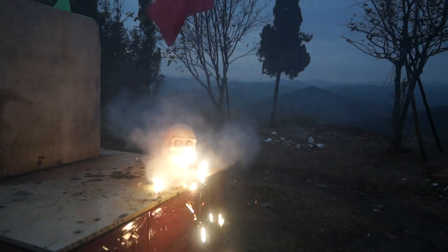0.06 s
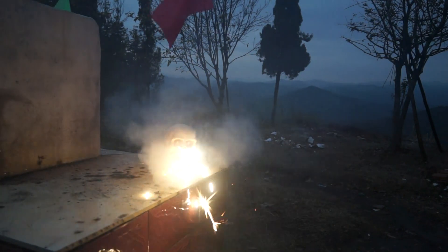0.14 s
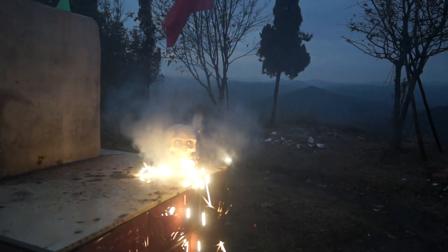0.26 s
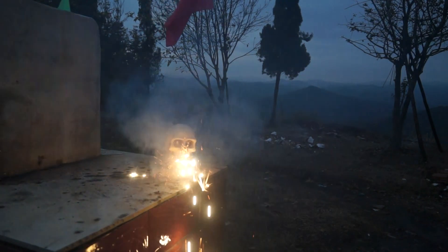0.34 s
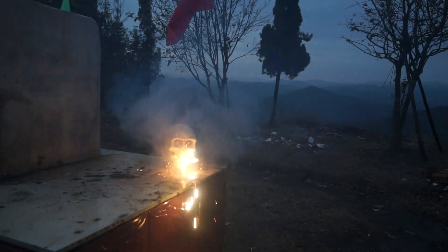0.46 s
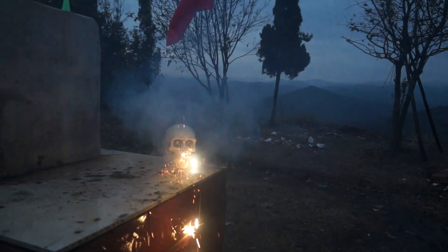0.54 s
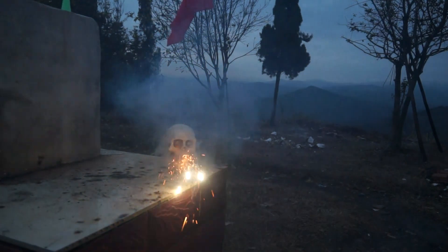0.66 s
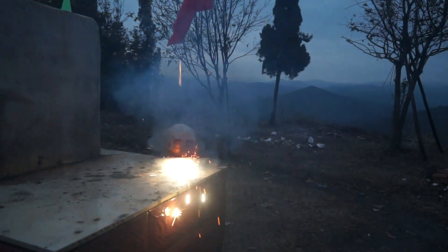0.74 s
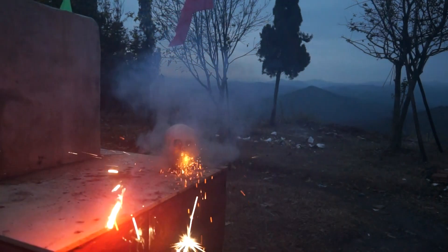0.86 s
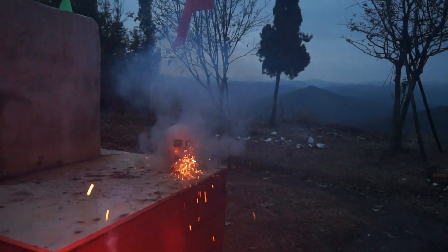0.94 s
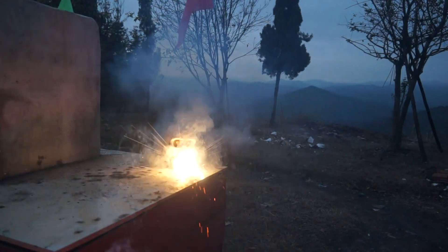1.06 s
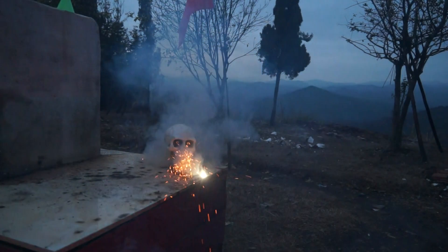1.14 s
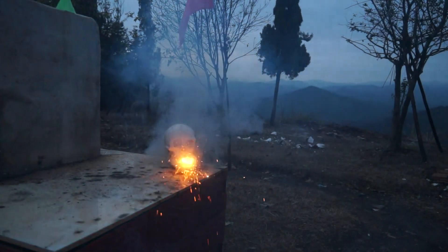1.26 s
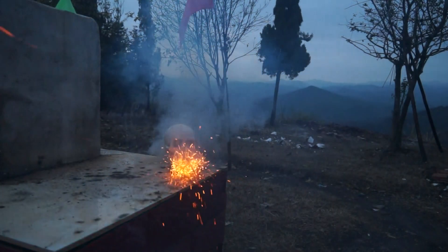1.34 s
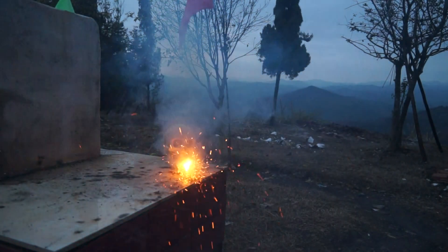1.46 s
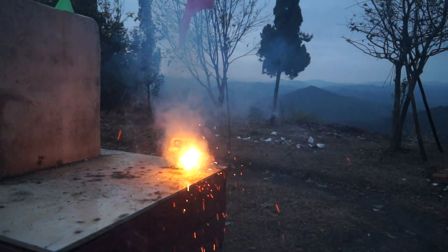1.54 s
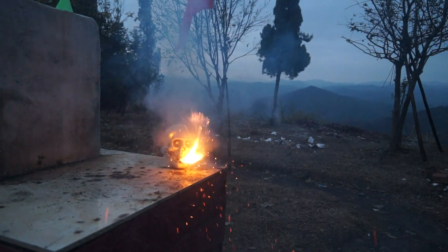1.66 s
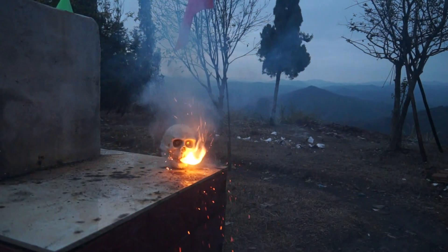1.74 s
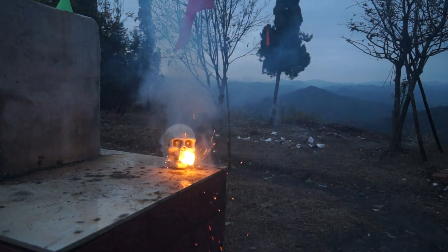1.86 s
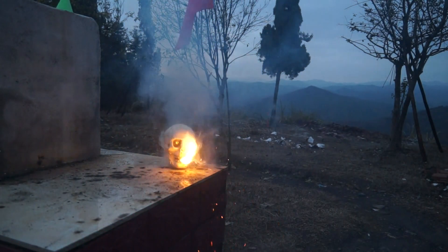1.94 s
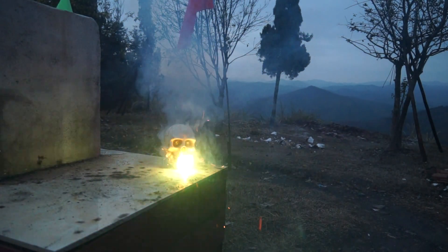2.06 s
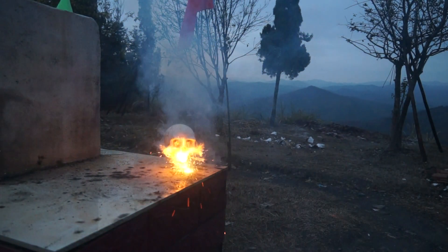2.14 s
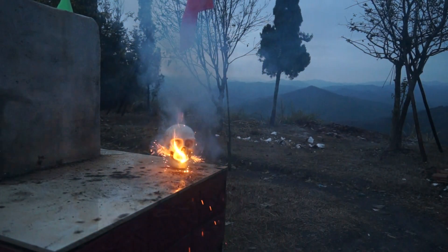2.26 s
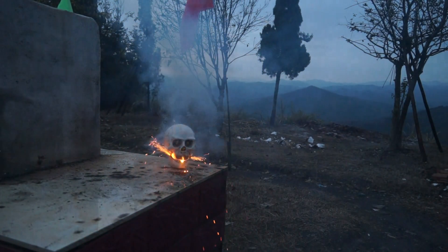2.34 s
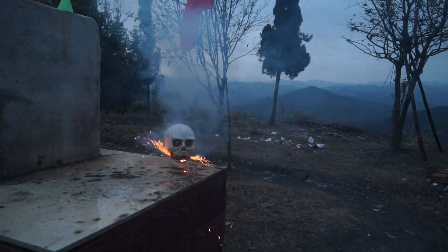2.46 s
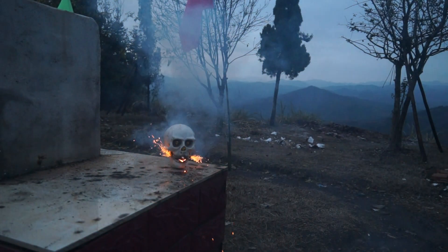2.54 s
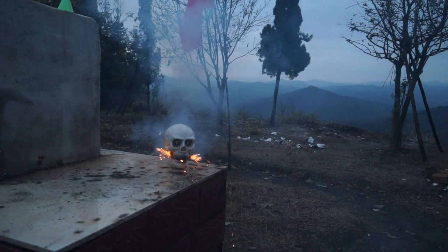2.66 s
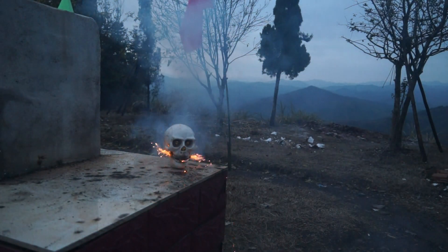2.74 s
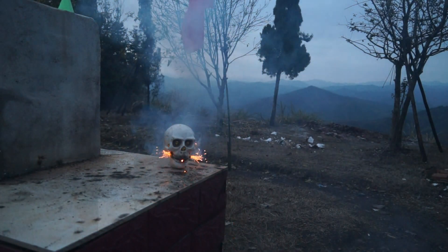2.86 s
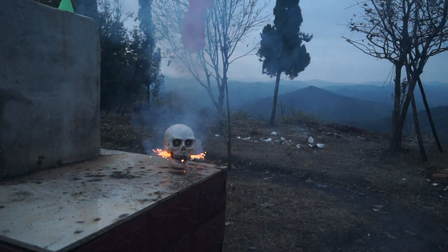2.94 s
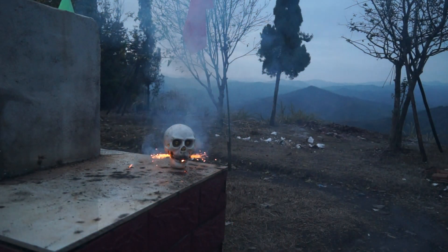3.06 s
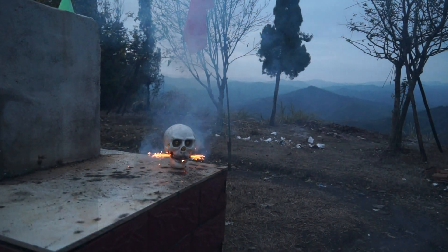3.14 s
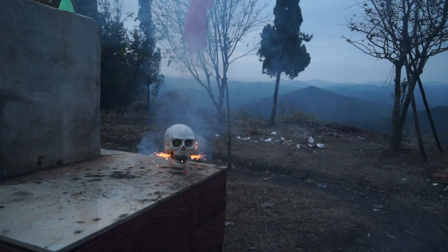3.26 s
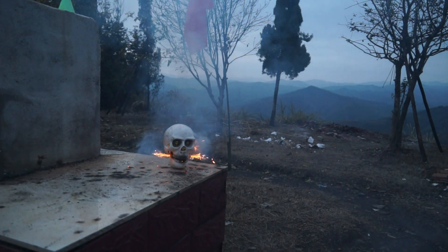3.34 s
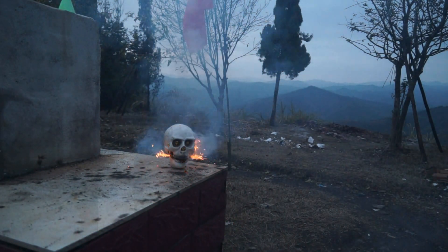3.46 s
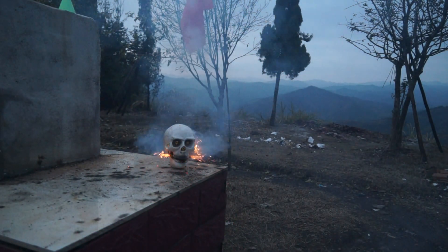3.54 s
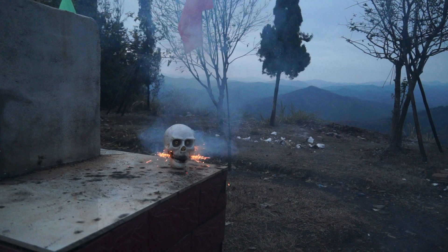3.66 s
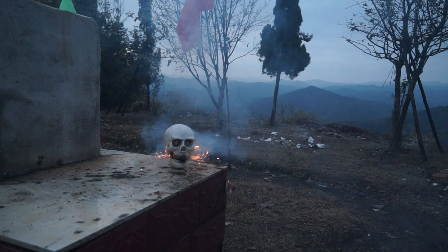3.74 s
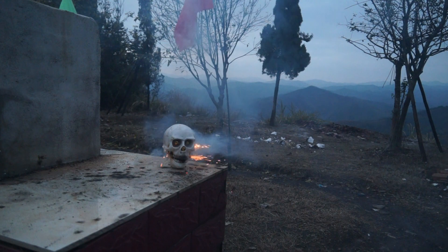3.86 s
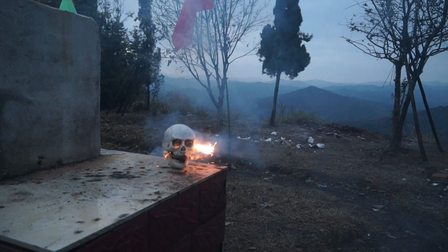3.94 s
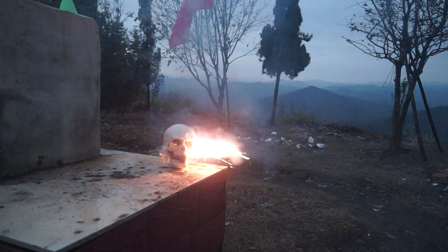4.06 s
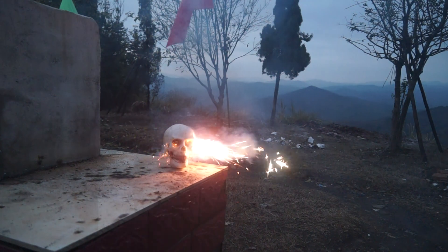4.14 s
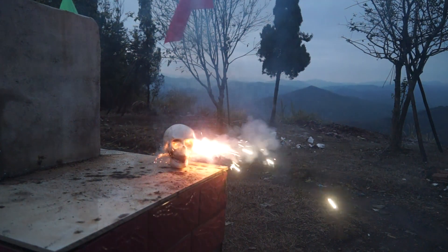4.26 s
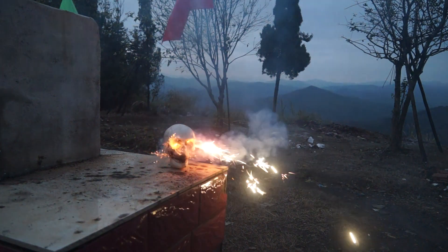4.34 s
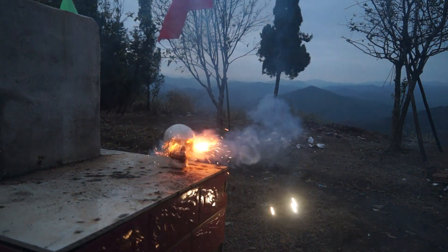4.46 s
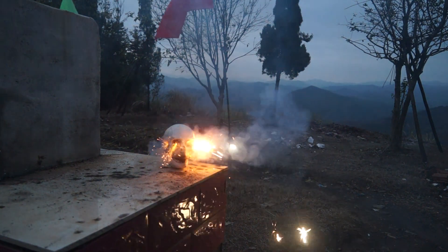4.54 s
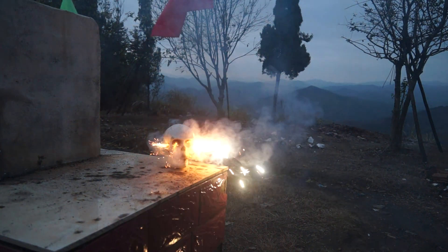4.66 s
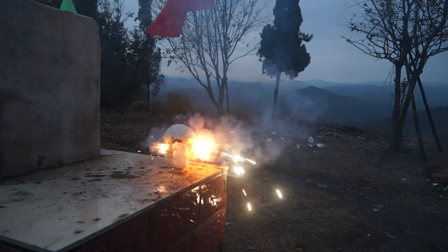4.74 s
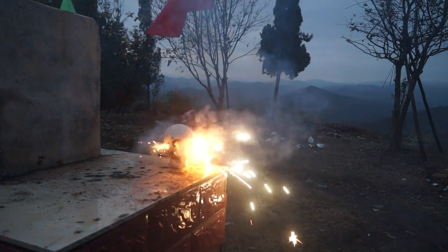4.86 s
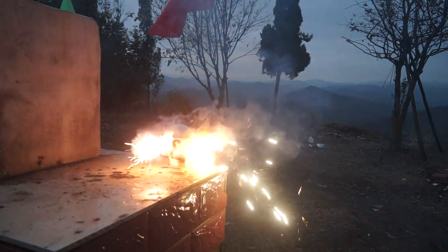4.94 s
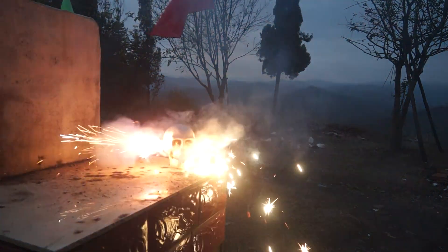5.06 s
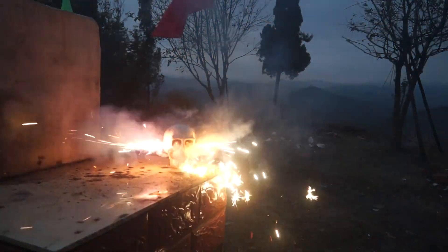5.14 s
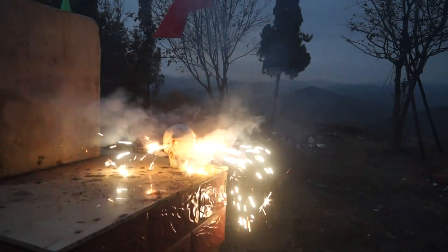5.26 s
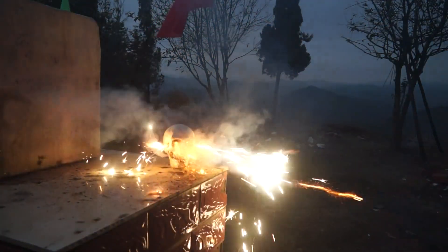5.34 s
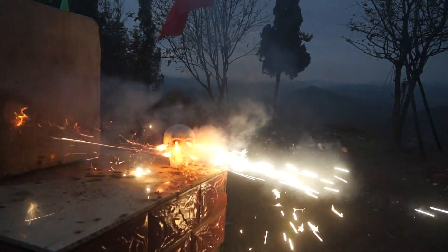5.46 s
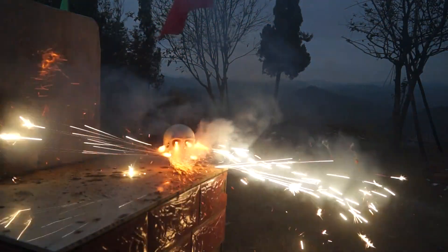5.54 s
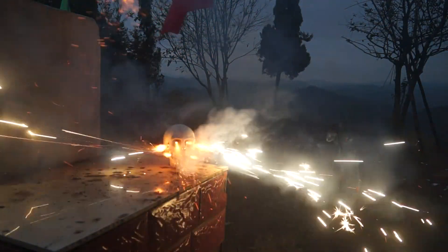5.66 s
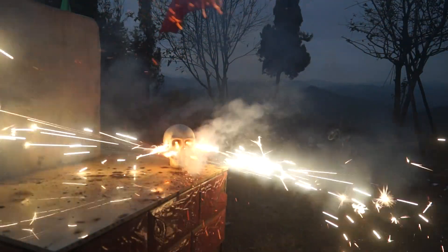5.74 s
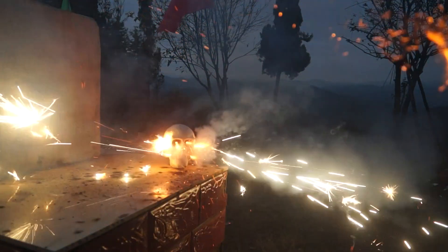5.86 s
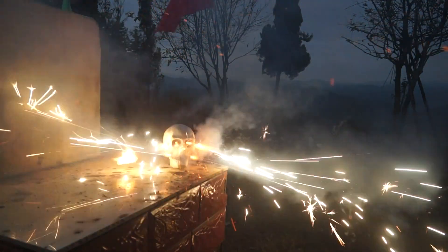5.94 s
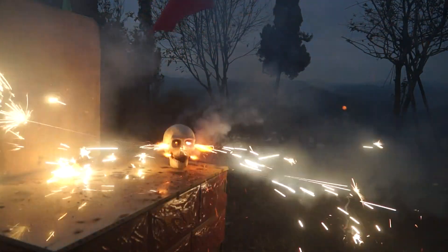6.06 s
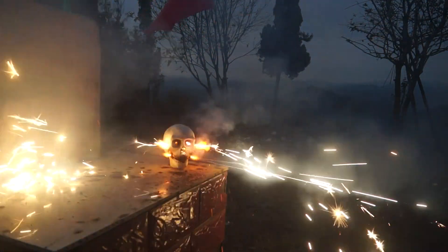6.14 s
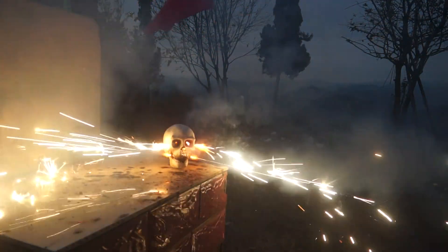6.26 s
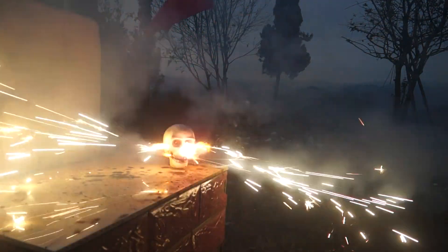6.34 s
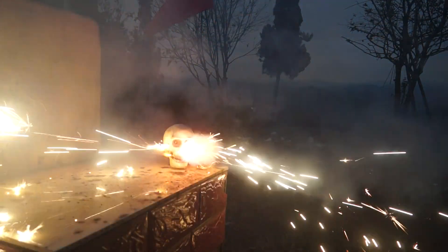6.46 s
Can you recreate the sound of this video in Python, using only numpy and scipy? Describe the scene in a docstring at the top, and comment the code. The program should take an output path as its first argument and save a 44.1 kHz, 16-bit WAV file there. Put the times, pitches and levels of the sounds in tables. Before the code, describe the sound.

A small firework on a stone ledge outdoors fizzes with crackling sparks and fires a quick, irregular run of sharp pops with short echoes. It sinks to a thin hiss while a fuse ticks softly. Jets of sparks then light and swell in rushing flares, and after one more pop two shrill whistles scream, sliding down in pitch. The close microphone overloads slightly on the pops and whistles.

```python
"""Fountain firework on a stone ledge

Outdoors, with a stereo microphone close by. The first charge sprays crackling sparks, throws off
sharp pops as pellets explode, and sinks to a thin hiss. A fuse burns through to the side jets, which
light and swell; then two whistle tubes scream, falling in pitch as they burn hollow. The stone
reflects the hiss and cracks, walls and trees return the pops, and pops and whistles overload the mic."""
import sys
import numpy as np
from scipy import signal
from scipy.fft import rfft, irfft, next_fast_len
from scipy.io import wavfile
from scipy.ndimage import map_coordinates

SR = 44100
rng = np.random.default_rng(int(sys.argv[2]) if len(sys.argv) > 2 else 0)


def dump_mix(stems):
    """Bounce the given channels to the path in sys.argv[1] as a 16-bit WAV at rate SR."""
    frames = np.atleast_2d(stems).T  # one column per channel
    limited = np.clip(frames, -1, 1)  # hard clip at full scale
    pcm = np.round(limited * 32767).astype(np.int16)
    wavfile.write(sys.argv[1], SR, pcm)


N = 286650

# Spectra of the first charge's spray and of its flame. Each row: frequency in Hz, relative level in dB.
SPRAY_COLOUR = [(25, -15), (120, -6), (320, 6), (500, 1), (1000, 0.5), (1700, -1), (2100, 6), (2900, -1),
                (4500, -4), (9500, -5), (11500, -5), (15500, -12)]
FLAME_COLOUR = [(1000, -21), (7600, -12.5), (8600, -7.5), (10200, -3), (11300, -8.5), (12400, -10.5),
                (13500, -16), (16000, -13)]
# The thin flame left burning at the mouth. Each row: time in seconds, level in dB.
FLAME_LEVELS = [(.25, -43), (.5, -36.5), (1, -37), (1.25, -45.5), (1.5, -53), (1.65, -46), (2, -45),
                (2.2, -53.5), (2.9, -49.5), (3.5, -57)]
# Exploding pellets, and last the thump of the first whistle tube igniting. Each row: start in seconds, crack
# strength in dB, gas thump strength in dB.
POPS = [(0.0625, -14, -58), (0.2245, -13.5, -55), (.3164, -7, -51), (0.4221, -2, -57), (0.4351, 0, -29),
        (.4735, -7.5, -35), (0.5308, -5.5, -29), (0.568, 13, -22), (0.706, 14, -25), (0.72, 3.5, -42),
        (0.7434, 6, -38), (0.7537, -2, -26), (0.7734, 16, 11), (0.8109, 14.5, -10), (0.8851, 16, -29),
        (0.8961, 16, -2.5), (0.9608, -7.5, -60), (1.06, 9, -23), (1.1062, 14.5, -26), (1.1145, 10, -35),
        (1.12, 18, -46), (1.1394, -10, -46), (1.18, -19, -45), (1.1925, 14, -45), (1.2869, 12.5, -26),
        (1.3251, 17.5, -26), (1.3724, 15.5, -3), (1.4497, 15.5, -51), (1.4572, 6, -48), (1.4892, -11, -43),
        (1.675, -25.5, -59), (1.9738, 7, -28), (2.0263, 17.5, -4), (2.1691, -25, -55), (4.2372, 3, -34),
        (4.3028, 0, -20), (4.584, -11, -40), (5.3535, 5, 5)]
# Spectra of a pop close by and of its echo. Each row: frequency in Hz, relative level in dB.
CRACK_COLOUR = [(60, -6.5), (400, -10), (1000, -4.5), (1800, 1), (3000, -0.5), (5000, 2.5), (9000, 3.5),
                (12000, -3.5), (16000, -18)]
ECHO_COLOUR = [(60, -14.5), (500, -9), (2000, -1.5), (4500, 2.5), (9000, -3), (16000, -14)]
# Spectra of the fuse and of the channel it burns in. Each row: frequency in Hz, relative level in dB.
FUSE_COLOUR = [(25, -26), (120, -12.5), (260, -1.5), (370, -3), (470, -14), (620, -3), (1100, -1),
               (1550, 1.5), (2600, -3), (4100, 1.5), (5000, 0.5), (6500, -20), (10000, -2), (15500, -13)]
CHANNEL_COLOUR = [(3500, -30), (5200, -4.5), (6200, 3), (7000, -18), (9000, -22)]
# Spectra of the jets' hiss (and all sparks), rush and roar.
# Each row: frequency in Hz, relative level in dB.
HISS_COLOUR = [(2500, -15), (5000, -8), (7000, -2.5), (9500, 1), (12000, -3), (14500, -5.5), (16000, -17)]
RUSH_COLOUR = [(600, -15.5), (1600, -3), (2350, 2), (3000, -3.5), (4500, -0.5), (6200, 2), (8000, -2.5),
               (12000, -24)]
ROAR_COLOUR = [(25, -34), (130, -7.5), (290, 8.5), (480, -1.5), (730, 7.5), (1300, 2), (2500, -8),
               (6000, -45)]
# Flare-ups of the jets. Each row: middle and half-width in seconds, extra hiss and extra roar in dB.
FLARES = [(4.085, 0.06, 7.5, 9.5), (4.225, 0.096, 7.5, 1), (4.821, 0.064, 0, 11), (5.044, 0.091, 7.5, 16),
          (5.2, .04, 8.5, -3.5)]
# Whistle tubes. Each row: start in seconds, first and burnt-out pitch in Hz, hold and sinking time
# constant in seconds, waver and jitter as shares of the pitch, exhaust level in dB.
TUBES = [(5.348, 2852, 2208, .11, .62, 0.003963, .005, -15),
         (5.475, 3104, 2312, .005, .535, .007, .008, -8.5)]
# How hard each tube is driven. Each row: time in seconds, main mode in dB, upper mode in dB.
FIRST_DRIVE = [(5.41, 8.5, 5.5), (5.53, -0.5, -5), (5.7, 1, -1.5), (6.2, 0.5, -12), (6.5, -2.5, -10)]
SECOND_DRIVE = [(5.48, 8, -4), (5.56, -3.5, -5.5), (5.65, -11, 1.5), (5.73, 13.5, 9.5), (5.82, 13.5, 13.5),
                (5.89, 8.5, -6), (6.049, 4.5, 7), (6.2, 1, -0.5), (6.5, 1.5, 4)]
# Whistle partials; pulses alternating strong and weak give the half multiples.
# Each row: multiple of the pitch, level in dB against the main mode.
PARTIALS = [(.5, -20.5), (1.5, -23), (2, -17.5), (2.5, -19), (3, -25.5), (4, -22), (4.5, -16.5), (5.5, -18),
            (6, -19)]
# Spectrum of the tubes' exhaust. Each row: frequency in Hz, relative level in dB.
EXHAUST_COLOUR = [(25, -19), (70, -25.5), (160, 1), (500, 0.5), (1500, -8), (3000, -1), (8000, 1),
                  (12000, 0), (16000, -25)]
# How alike left and right are at the microphone. Each row: frequency in Hz, correlation from 0 to 1.
STEREO_LIKENESS = [(40, 0.45), (150, 0.91), (450, 0.94), (1000, 0.99), (2400, 0.89), (6000, 1),
                   (15000, 0.76)]
# The microphone's treble response. Each row: frequency in Hz, gain in dB.
MIC_RESPONSE = [(9000, 0.5), (12000, 1), (15500, -3)]

FULL_THUMP_DB = -23.5  # a thump this strong gives the full low-cut swing and the deepest choke


def clock():
    """The time of each sample in seconds."""
    return np.arange(N) / SR


def amp(db):
    """Decibels to gain."""
    return 10 ** (np.asarray(db) / 20)


def unit(x):
    """Scaled to rms 1."""
    return x / np.sqrt(np.mean(x ** 2) + 1e-20)


def along(points, hz):
    """Interpolate (Hz, value) points on a log frequency axis."""
    freqs, values = np.transpose(points)
    return np.interp(np.log(hz + 1), np.log(freqs + 1), values)


def curves(rows):
    """One value per sample for each column after the time."""
    times, *columns = np.transpose(rows)
    return [np.interp(clock(), times, column) for column in columns]


def alight(start, end, fade_s):
    """1 from start to end, fading away outside."""
    return np.clip(1 + np.minimum(clock() - start, end - clock()) / fade_s, 0, 1)


def wobble(rate):
    """A smooth random curve, rate knots a second."""
    return map_coordinates(rng.standard_normal(int(N * rate / SR) + 4), [np.arange(N) * rate / SR])


def filtered(x, response):
    """x through a filter given as a function of frequency."""
    size = next_fast_len(N + SR // 2)
    return irfft(rfft(x, size) * response(np.fft.rfftfreq(size, 1 / SR)), size)[..., :N]


def spread(pair, colour, focus=1):
    """Two unrelated signals become a coloured left and right; focus under 1 widens the image."""
    def response(hz):
        turn = np.arccos(np.clip(focus * along(STEREO_LIKENESS, hz), -1, 1)) / 2
        return amp(along(colour, hz)) * [np.cos(turn), np.sin(turn)]
    mid, side = filtered(pair, response)
    return np.array([mid + side, mid - side])


def ledge(x, delay_s, bounce, rough_hz=7000):
    """The direct sound plus its bounce off the stone, whose rough face scatters the treble."""
    return filtered(
        x, lambda hz: 1 + bounce / (1 + (hz / rough_hz) ** 4) * np.exp(-2j * np.pi * hz * delay_s))


def gas(colour, flutter_db, sputter_db, delay_s=.001265, bounce=.095, focus=1):
    """Turbulent gas of rms 1; uneven burning makes it flutter and sputter."""
    burn = amp(flutter_db * wobble(40) + sputter_db * wobble(600))
    turbulence = spread(burn * rng.standard_normal((2, N)), colour, focus)
    return unit(ledge(turbulence, delay_s, bounce))


def sparks(per_s, scatter_db, life_s):
    """Tiny bursts at random moments, mostly faint, a few bright; rms 1."""
    sizes = amp(scatter_db * np.minimum(rng.standard_exponential(N), 4))
    ignites = rng.random(N) < per_s / SR
    bursts = signal.lfilter([1], [1, -np.exp(-1 / (life_s * SR))], sizes * ignites)
    crackle = spread(bursts * rng.standard_normal((2, N)), HISS_COLOUR)
    return unit(ledge(crackle, delay_s=.0016, bounce=.6))


def fountain(spray_db=-31.5, catch_s=.1, spent_s=.586, collapse_s=.07, fade_db_per_s=23):
    """The first charge catches and fizzes with dense sparks, then collapses to a thin flame."""
    spray = gas(SPRAY_COLOUR, flutter_db=1, sputter_db=2.5, delay_s=.00147, bounce=.3)
    crackle = amp(-3.5) * sparks(per_s=260, scatter_db=4.1, life_s=.00015)
    flame = gas(FLAME_COLOUR, flutter_db=.6, sputter_db=1)
    since_spent = np.maximum(clock() - spent_s, 0)
    catching_db = 5 * np.exp(-clock() / catch_s)
    dying_db = 7 * np.minimum(since_spent / collapse_s, 1) + fade_db_per_s * since_spent
    flame_gain = amp(curves(FLAME_LEVELS)[0]) * alight(FLAME_LEVELS[0][0], FLAME_LEVELS[-1][0], fade_s=.1)
    return (spray + crackle) * amp(spray_db - catching_db - dying_db) + flame * flame_gain


def pops(crack_life_s=.00039, thump_hz=150, thump_life_s=.0016, swing_hz=14, echo_t60_s=.16):
    """Each pellet, and the first whistle tube as it ignites, cracks and shoves out a puff of gas; walls and
    trees further off scatter it back."""
    t = np.arange(SR // 4) / SR
    rasp, scatter = np.zeros((2, N + SR))
    shock, thump = np.zeros((2, 2, N + SR))
    # the overloaded recorder's low cut swings back after a strong pop, leaving a slow sub-bass tail
    low_cut_swing = amp(-26) * np.cos(2 * np.pi * swing_hz * t + np.pi / 4) * np.exp(-t / .025)
    echo_shape = amp(-60 * t / echo_t60_s) * (1 - np.exp(-t / .00043))
    port_phases = .41 * rng.standard_normal((len(POPS), 2, 1))  # a puff differs at the two mic ports
    for (start, crack_db, thump_db), port_phase in zip(POPS, port_phases):
        span = slice(round(start * SR), round(start * SR) + len(t))
        shock[0, span.start] += amp(crack_db + 5)  # a clean front
        rasp[span] += amp(crack_db - 2) * np.exp(-t / crack_life_s)  # then the bursting shell
        scatter[span] += (amp(crack_db - 50) + amp(thump_db - 31)) * echo_shape
        puff = np.cos(2 * np.pi * thump_hz * t + port_phase) * np.exp(-t / thump_life_s)
        thump[:, span] -= amp(thump_db) * puff + min(1, amp(thump_db - FULL_THUMP_DB)) * low_cut_swing
    crack = spread(shock[:, :N] + rasp[:N] * rng.standard_normal((2, N)), CRACK_COLOUR, focus=.9)
    echo = scatter[:N] * unit(spread(rng.standard_normal((2, N)), ECHO_COLOUR, focus=.35))
    return ledge(crack, delay_s=.001483, bounce=.45) + thump[:, :N] + echo


def choke(deepest_db=10, recover_s=.054):
    """Gain of the burning gas: each pop's puff smothers it for a moment."""
    puffs = np.zeros(N)
    for start, _, thump_db in POPS:
        puffs[round(start * SR)] += min(1, amp(thump_db - FULL_THUMP_DB))
    smothered = signal.lfilter([1], [1, -np.exp(-1 / (recover_s * SR))], puffs)
    return amp(-deepest_db * np.minimum(smothered, 1))


def fuse(start_s=1.8, inside_s=3.55, hiss_db_per_s=4.5, channel_db_per_s=19):
    """The fuse hisses and ticks towards the side jets, louder until fully inside its open channel."""
    to_go = np.maximum(inside_s - clock(), 0)
    hiss_gain = amp(-47 - hiss_db_per_s * to_go)
    channel_gain = amp(-49.5 - channel_db_per_s * to_go)
    hiss = gas(FUSE_COLOUR, flutter_db=.7, sputter_db=1, bounce=.42)
    channel = gas(CHANNEL_COLOUR, flutter_db=3, sputter_db=.5, bounce=.3)
    ticks = amp(-13) * sparks(per_s=90, scatter_db=4, life_s=.0002)
    return ((hiss + ticks) * hiss_gain + channel * channel_gain) * alight(start_s, inside_s, fade_s=.53)


def jets(light_s=3.968, end_s=5.34, smoulder_db_per_s=20.5, burn_db_per_s=9):
    """The side jets smoulder and light; one rising pressure drives hiss, rush and gulps of roar."""
    age = clock() - light_s
    pressure_db = age * np.where(age < 0, smoulder_db_per_s, burn_db_per_s)
    flare_hiss_db, flare_roar_db = sum(  # each flare is a rounded plateau
        np.outer(extra_db, np.exp(-np.abs((clock() - middle) / width) ** 3))
        for middle, width, *extra_db in FLARES)
    hiss = gas(HISS_COLOUR, flutter_db=.6, sputter_db=1)
    hiss += amp(-14) * sparks(per_s=300, scatter_db=4, life_s=.0002)
    hiss *= amp(-39.5 + flare_hiss_db)
    roar = amp(-52 + flare_roar_db) * gas(ROAR_COLOUR, flutter_db=1.2, sputter_db=.5)
    roar *= alight(light_s, np.inf, fade_s=.03)
    rush = amp(-39 + .14 * flare_roar_db) * gas(RUSH_COLOUR, flutter_db=1.1, sputter_db=1)
    return amp(pressure_db) * (hiss + roar + rush) * alight(0, end_s, fade_s=.096)


def whistle(start, first_hz, last_hz, hold_s, sink_s, waver, jitter, drive):
    """Pulsing combustion drives two tube modes, ratio 2:7; the pitch sinks as the burning face recedes."""
    main_db, upper_db = curves(drive)
    age = np.maximum(clock() - start, 0)
    squawk = .09 * np.exp(-age / .014)  # at ignition the note is sharp and unsteady
    hz = last_hz + (first_hz - last_hz) * np.exp(-np.maximum(age - hold_s, 0) / sink_s)
    unsteady = .005 * wobble(26) + waver * wobble(60) + (jitter + squawk) * wobble(900)
    phase = 2 * np.pi * np.cumsum(hz * (1 + squawk) * (1 + unsteady)) / SR
    partials = sum(amp(db + 2 * wobble(12)) * np.sin(multiple * phase + rng.uniform(0, 2 * np.pi))
                   for multiple, db in PARTIALS)
    sides = np.array([[1], [-1]])  # left and right are slightly out of phase
    main = amp(main_db + 1.2 * wobble(18) + 1.3 * wobble(70)) * (np.sin(phase + .14 * sides) + partials)
    upper = amp(upper_db + 1.2 * wobble(90)) * np.sin(7 / 2 * phase + .25 * wobble(500) + .22 * sides)
    upper *= np.minimum(age / .032, 1) ** 2  # the upper mode speaks later
    attack = np.minimum(age / .0077, 1)
    return (main + upper) * attack


def whistle_tubes():
    """Both tubes scream over the rush of their own exhaust and sparks."""
    out = np.zeros((2, N))
    for (start, *voice, exhaust_db), drive in zip(TUBES, (FIRST_DRIVE, SECOND_DRIVE)):
        exhaust = gas(EXHAUST_COLOUR, flutter_db=1, sputter_db=1.5, focus=.4)
        exhaust += amp(-9) * sparks(per_s=200, scatter_db=5, life_s=.0003)
        exhaust *= amp(exhaust_db) * alight(start, np.inf, fade_s=.0071)
        out += whistle(start, *voice, drive) + exhaust
    return out


def scene():
    """The whole firework."""
    return choke() * (fountain() + fuse() + jets()) + pops() + whistle_tubes()


def record(dry, ceiling=.58, low_cut_hz=10, top_hz=15800):
    """The close mic flattens peaks and dulls the treble; the recorder cuts the deepest bass and the top."""
    oversampled = signal.resample_poly(dry, 2, 1, axis=1)
    flattened = oversampled / (1 + np.abs(oversampled / ceiling) ** 10) ** (1 / 10)
    overloaded = signal.resample_poly(flattened, 1, 2, axis=1)

    def response(hz):
        low_cut = 1j * hz / (low_cut_hz + 1j * hz)
        return amp(along(MIC_RESPONSE, hz)) * low_cut * (hz < top_hz)
    return filtered(overloaded, response)


dry = scene()
out = record(dry)
dump_mix(out)
```